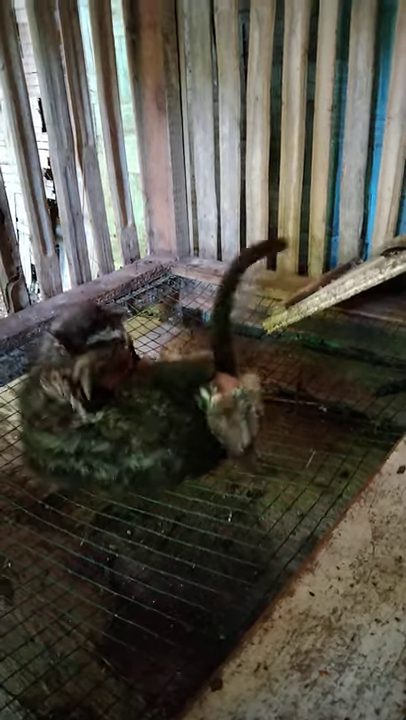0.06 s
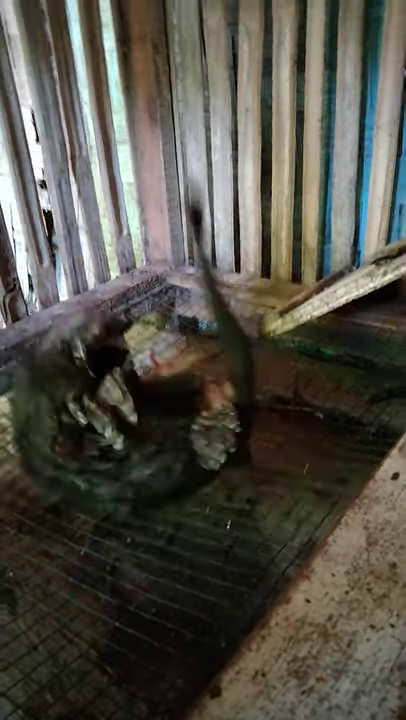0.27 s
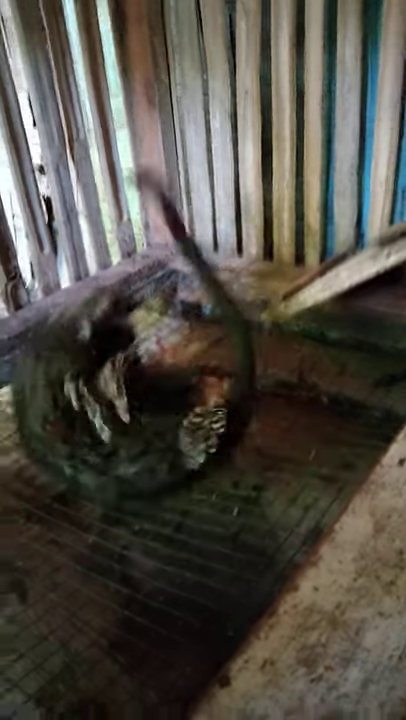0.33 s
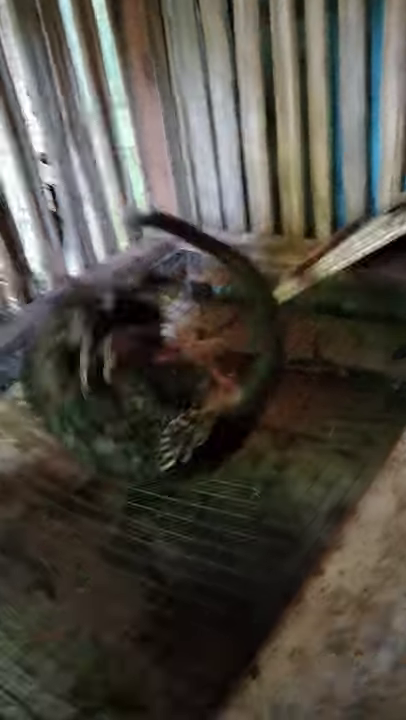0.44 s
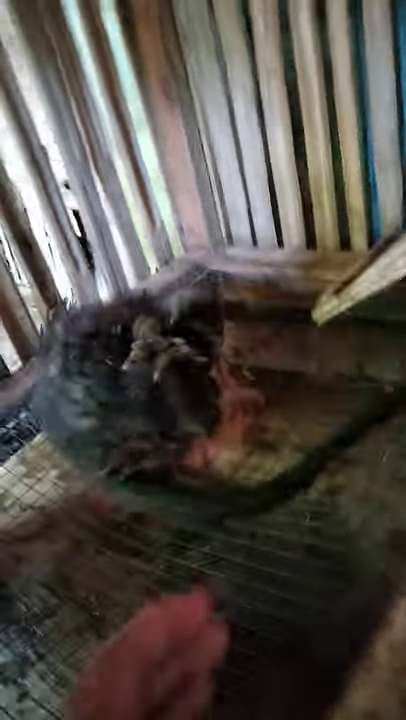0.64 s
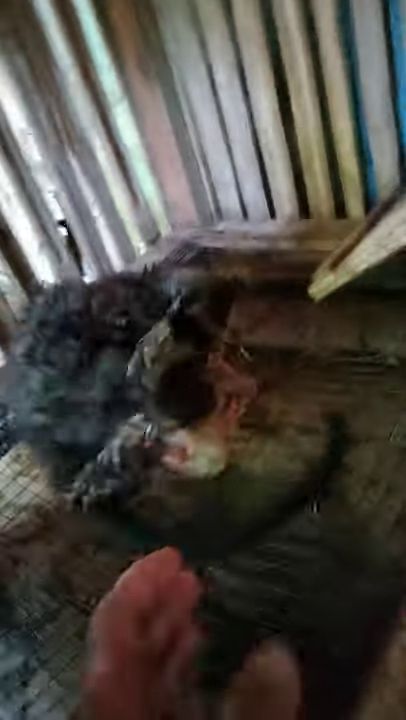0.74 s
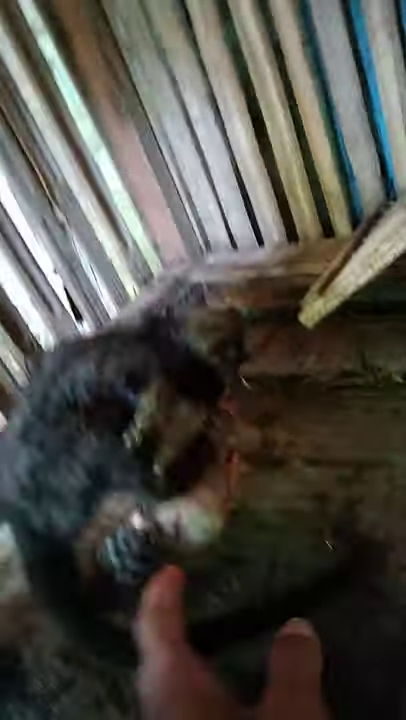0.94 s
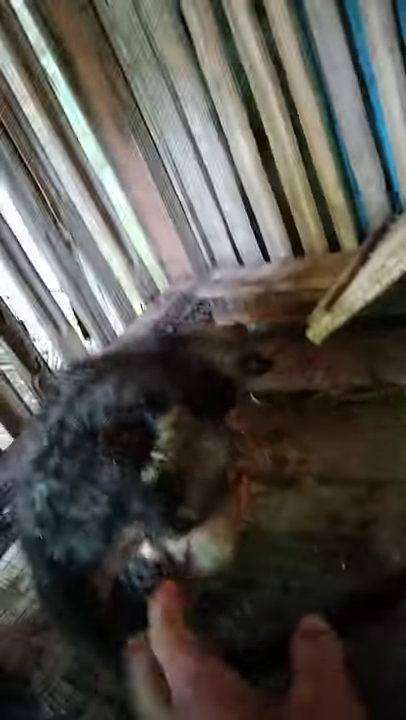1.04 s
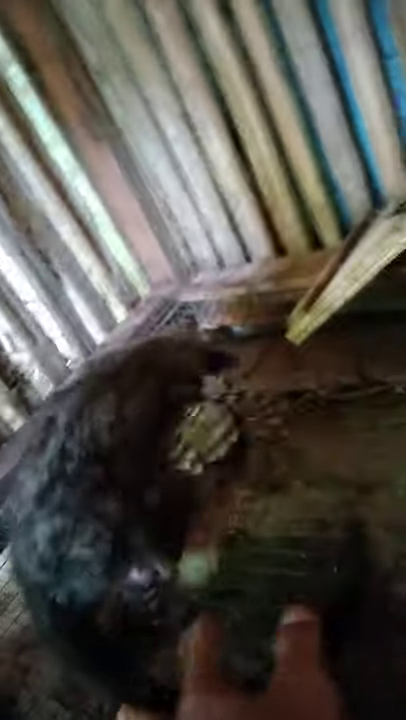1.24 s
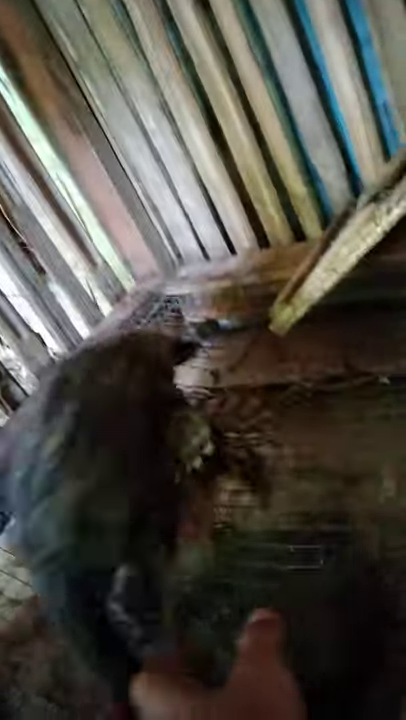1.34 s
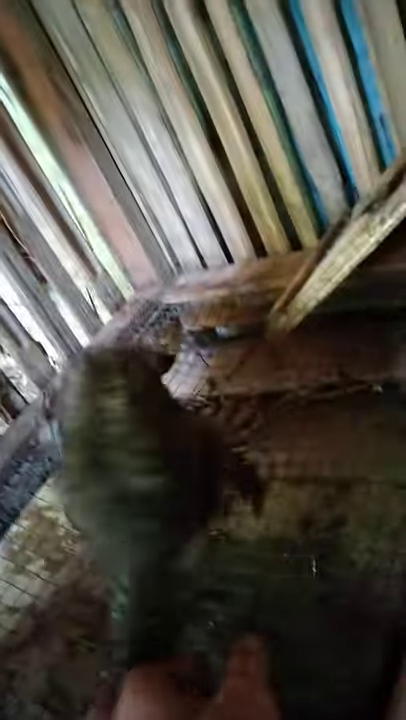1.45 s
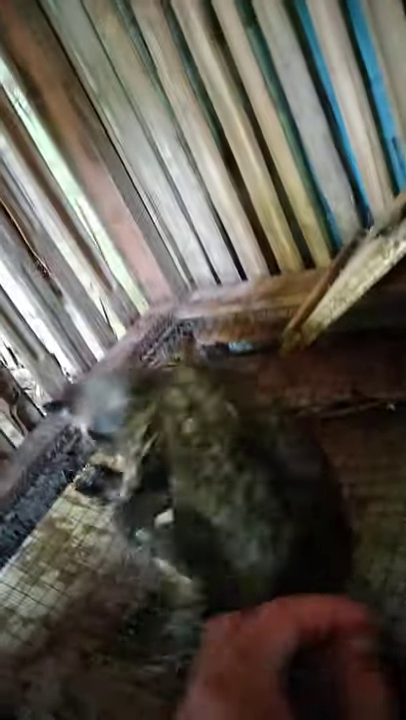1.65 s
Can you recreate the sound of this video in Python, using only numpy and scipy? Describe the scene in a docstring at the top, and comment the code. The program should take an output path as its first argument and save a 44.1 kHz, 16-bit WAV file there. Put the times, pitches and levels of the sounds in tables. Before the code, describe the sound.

Close, slightly boxy pickup: a shrill animal squeal slides down and cracks within half a second, with soft fur and claw scuffing, then a scramble of dull knocks on boards, quiet low rumble and thin insect tone behind.

```python
"""From the start, a small furry animal in a slatted wooden cage scuffs over the wire-mesh floor and whistles.
Its one high cry begins as two clashing tones, goes on as a pure one, falls in two steps and breaks.
The scuffs, made of tiny clicks, go on; later come bumps that ring the boards as it scrambles away.
The cage adds a short ring to all this. A low noise rumble and a faint, thin insect tone last throughout."""
import sys
import numpy as np
from scipy import signal
from scipy.fft import rfft, irfft
from scipy.io import wavfile
from scipy.ndimage import uniform_filter1d

SR = 44100
rng = np.random.default_rng(int(sys.argv[2]) if len(sys.argv) > 2 else 0)


def generate_wav(signal):
    """Clip the signal to [-1, 1] and save it as 16-bit WAV at the path in sys.argv[1]."""
    frames = np.transpose(np.atleast_2d(signal))
    scaled = np.clip(frames, -1, 1) * 32767
    pcm = np.round(scaled).astype(np.int16)
    wavfile.write(sys.argv[1], SR, pcm)


N = 74970  # length in samples, 1.7 s


def undb(db):
    """Turn decibels into a plain gain."""
    return 10 ** (np.asarray(db) / 20)


def unit(x):
    """Scale to rms 1."""
    return x / np.sqrt(np.mean(x ** 2) + 1e-20)


def curve(table, axis=1):
    """One column of a table, joined by straight lines in time."""
    rows = np.array(table)
    return np.interp(np.arange(N) / SR, rows[:, 0], rows[:, axis])


def colour(x, spectrum):
    """Shape a signal with a spectrum, joined by straight lines over log frequency; rms 1."""
    hz, db = np.array(spectrum).T
    f = np.maximum(np.fft.rfftfreq(N, 1 / SR), 1)
    gain = undb(np.interp(np.log(f), np.log(hz), db))
    return unit(irfft(rfft(x) * gain, N))


def resonate(x, hz, width):
    """One resonance, gain 1 at its centre."""
    return signal.lfilter(*signal.iirpeak(hz, hz / width, fs=SR), x)


def walk(rate):
    """Smooth random drift with about `rate` new values a second; rms 1."""
    k = int(SR / rate)
    steps = np.repeat(rng.standard_normal(N // k + 1), k)
    return unit(uniform_filter1d(steps, k)[:N])


CONTACT_LIFE = 2.9  # contact ends after about this many decay times


def swell(peak_s, rise_s, decay_s):
    """An envelope that climbs to a peak, dies away and stops."""
    t = np.arange(N) / SR - peak_s
    age = np.maximum(t, 0) / decay_s
    return np.exp(-(np.minimum(t, 0) / rise_s) ** 2 - age - (age / CONTACT_LIFE) ** 2)


GRAINS_PER_S, GRAIN_SPREAD_DB = 4500, 3.5


def contacts(rub=0.46):
    """Dense tiny clicks of uneven size over smooth rubbing."""
    happens = rng.random(N) < GRAINS_PER_S / SR
    sign = rng.choice([-1, 1], N)
    size = undb(GRAIN_SPREAD_DB * np.minimum(rng.exponential(size=N), 4))
    return unit(unit(happens * sign * size) + rub * rng.standard_normal(N))


# pitch of the main whistle: t/s, f/Hz
WHISTLE_PITCH = [(0, 4520), (.06, 4502), (.1, 4600), (.118, 4640), (.14, 4530), (.175, 4492), (.196, 4420),
                 (.208, 4210), (.226, 3945), (.262, 3828), (.287, 3670), (.315, 3670), (.356, 3453),
                 (.378, 2928), (.388, 2500), (.396, 2356), (.401, 1998), (.42, 2002)]
# strength of the cry as heard, with a brief dip where reflections cancel it:
# t/s, level/dB, octave overtone level/dB relative to the fundamental
HEARD_LEVEL = [(0, -45.5, -11), (.055, -43, -14.5), (.1, -39, -10.5), (.125, -39, -6.5), (.172, -40, -9),
               (.19, -31.5, -10.5), (.208, -31, -21), (.225, -19, -15), (.252, -21, -20),
               (.28, -18.5, -26.5), (.3, -23, -23), (.322, -20, -19), (.34, -52.5, 3.5), (.352, -22, -15.5),
               (.37, -31.5, -26.5), (.388, -35, -28.5), (.403, -31, -33), (.412, -48.5, -29)]
# second whistle: t/s, f/Hz above the main one, level/dB relative to the main one,
# level/dB of the combination tone above both, relative to the second whistle
SECOND_WHISTLE = [(0, 429, 9.5, -11.5), (.04, 446.6, 10, -13.5), (.068, 405.3, 2.5, -13.5),
                  (.1, 370, 0.5, -13), (.118, 392, 2, -17.5), (.14, 506, 1.5, -16.5), (.175, 489, 1, -20),
                  (.2, 373, 1, -25), (.222, 480, -21, -46), (.25, 509, -58.5, -71.5)]
# highest overtones: t/s, third overtone level/dB, fourth overtone level/dB
TOP_OVERTONES = [(0, -67, -90), (.13, -64.5, -88), (.22, -61, -97.5), (.262, -59, -79), (.28, -68.5, -63.5),
                 (.33, -55, -63.5), (.358, -62.5, -54.5), (.378, -78, -75), (.395, -100, -100)]
PITCH_JITTER, RELEASE_S = 0.0023, 0.036  # jitter as a fraction of the pitch
# the voice turns rough as it gives out: extra jitter at its peak, when, and how far to each side
BREAK_JITTER, BREAK_S, BREAK_LENGTH_S = 0.056, 0.3965, 0.012
# overtone roughness, scaled for each overtone: always there, extra for clashing whistles, and its speed
PURE_RASP, CLASH_RASP, RASP_HZ = 0.13, 0.14, 503
OCTAVE_ROUGHNESS, TOP_ROUGHNESS = 0.73, 1.7  # the highest overtones are rougher
UNDERTONE_DB, UNDERTONE_FALL_DB = -18, -10.5  # tone under the pair; the next one down is this much weaker
CROSS_TONE_DB = -9.5  # combination tones between the pair's overtones
SECOND_THIRD_DB = -7.5  # the second whistle's third overtone is weaker


def cry():
    """Two close whistles beat and make combination tones; the lower goes on alone, pure, then falls and breaks."""
    t = np.arange(N) / SR
    near_break = np.exp(-((t - BREAK_S) / BREAK_LENGTH_S) ** 2)
    jitter = PITCH_JITTER * walk(350) + BREAK_JITTER * near_break * walk(700)
    hz = uniform_filter1d(curve(WHISTLE_PITCH), size=200, mode="nearest") * (1 + jitter)
    gap_hz = curve(SECOND_WHISTLE) * (1 + 0.016 * walk(300))

    # complex tones: multiplying two adds their frequencies, dividing subtracts them
    main = np.exp(2j * np.pi * np.cumsum(hz) / SR)
    beat = np.exp(2j * np.pi * np.cumsum(gap_hz) / SR)

    # the two whistles share the power
    ratio = undb(curve(SECOND_WHISTLE, axis=2))
    lower = 1 / np.hypot(1, ratio)
    upper = ratio / np.hypot(1, ratio)
    clash = 2 * lower * upper  # 1 when they are equally strong

    above = undb(curve(SECOND_WHISTLE, axis=3) + 2 * walk(60)) * beat
    undertone = clash * lower * undb(UNDERTONE_DB + 2 * walk(60)) / beat
    below = undertone * (1 + undb(UNDERTONE_FALL_DB) / beat)
    cross = undb(CROSS_TONE_DB) * clash * beat

    def rasp(scale):
        depth = scale * (PURE_RASP + CLASH_RASP * clash)
        return 1 + depth * (walk(RASP_HZ) + 1j * walk(RASP_HZ))

    base = main * (lower + below + upper * beat * (1 + above + above ** 2))
    octave_mix = lower + cross + upper * beat ** 2 * (1 + 2 * above)
    octave = main ** 2 * rasp(OCTAVE_ROUGHNESS) * octave_mix
    third_mix = lower + cross * (1 + beat) + undb(SECOND_THIRD_DB) * upper * beat ** 3
    third = main ** 3 * rasp(TOP_ROUGHNESS) * third_mix
    fourth = main ** 4 * rasp(TOP_ROUGHNESS)

    low = undb(curve(HEARD_LEVEL)) * (base + undb(curve(HEARD_LEVEL, axis=2)) * octave)
    third_gain = undb(curve(TOP_OVERTONES) + 2 * walk(90))
    fourth_gain = undb(curve(TOP_OVERTONES, axis=2) + 2 * walk(81))
    high = third_gain * third + fourth_gain * fourth
    release = np.clip((HEARD_LEVEL[-1][0] - t) / RELEASE_S + 1, 0, 1)
    return np.sqrt(2) * release * (low + high).imag  # the root makes levels rms


# scuffs of fur and claws on the mesh: peak t/s, rise t/s, decay t/s, body level/dB, scratch level/dB
MESH_SCUFFS = [(.006, 0.0032, 0.028, -50.5, -60.5), (.095, 0.023, 0.036, -64.5, -63),
               (0.148, 0.018, 0.058, -60.5, -69.5), (0.195, 0.013, 0.036, -49, -60),
               (.255, 0.021, 0.058, -48.5, -59.5), (.267, 0.0045, .008, -54.5, -51.5),
               (0.404, 0.0056, 0.032, -57, -64.5), (0.486, .01, 0.064, -74.5, -69.5),
               (.578, .01, 0.037, -65.5, -70.5), (0.609, 0.0079, 0.035, -58, -59),
               (0.641, 0.0063, 0.0069, -58.5, -49), (0.656, 0.034, .024, -51, -84),
               (0.719, 0.012, 0.018, -61.5, -69.5), (.778, 0.032, 0.011, -66.5, -68.5),
               (.884, 0.0058, .012, -62.5, -64.5), (0.907, 0.022, 0.027, -53, -64),
               (.955, 0.0032, 0.0097, -60, -57), (0.989, 0.011, 0.013, -94, -69),
               (1.11, .012, 0.038, -58.5, -67), (1.139, 0.012, 0.031, -62.5, -59),
               (1.245, 0.018, 0.045, -54.5, -61.5), (1.306, 0.02, 0.056, -52.5, -64),
               (1.434, 0.0037, 0.077, -57.5, -62.5), (1.522, 0.028, 0.0068, -65, -62),
               (1.585, 0.037, 0.042, -55.5, -67), (1.664, 0.033, .05, -57, -62.5)]
# low rumbles of the floor: peak t/s, rise t/s, decay t/s, level/dB
FLOOR_RUMBLES = [(.275, 0.065, .03, -57), (.69, 0.058, 0.067, -60.5)]
# spectrum of the scuffs' body: f/Hz, level/dB
BODY_SPECTRUM = [(25, -49), (50, -26.5), (140, -5.5), (300, -6.5), (650, -1.5), (950, -6), (1420, 2),
                 (2000, -9), (2600, -18), (4500, -18), (15000, -44)]
# spectrum of the scratching: f/Hz, level/dB
SCRATCH_SPECTRUM = [(800, -23.5), (2400, 2.5), (3800, 2.5), (5500, -7.5), (7700, 0), (9500, -13.5),
                    (15000, -12.5)]
# spectrum of soft thuds, also used by the bumps: f/Hz, level/dB
THUD_SPECTRUM = [(30, -49.5), (60, -16), (100, 1.5), (170, -17), (400, -6.5), (1500, -36)]
FLOOR_HZ, FLOOR_WIDTH_HZ = 165, 33


def scuffs():
    """Sliding contacts shake the floor and scratch along the wires; the floor rumbles under shifting weight."""
    body_power = scratch_power = rumble_level = 0
    for s, rise, decay, body_db, scratch_db in MESH_SCUFFS:
        shape = swell(s, rise, decay)
        body_power = body_power + (undb(body_db) * shape) ** 2
        scratch_power = scratch_power + (undb(scratch_db) * shape) ** 2
    for s, rise, decay, db in FLOOR_RUMBLES:
        rumble_level = rumble_level + undb(db) * swell(s, rise, decay)
    body = np.sqrt(body_power) * colour(contacts(), BODY_SPECTRUM)
    scratch = np.sqrt(scratch_power) * colour(contacts(), SCRATCH_SPECTRUM)
    floor = unit(resonate(colour(contacts(), THUD_SPECTRUM), FLOOR_HZ, FLOOR_WIDTH_HZ))
    return body + scratch + rumble_level * floor


# bumps against the boards: peak t/s, rise t/s, decay t/s, wood level/dB, crack level/dB,
# thud level/dB, most excited f/Hz, treble lift of the crack level/dB
BOARD_BUMPS = [(1.077, 0.0082, 0.019, -48.5, -49, -75, 790, 1),
               (1.149, .005, 0.0066, -53, -80, -71, 444, 0),
               (1.208, 0.0036, 0.016, -45, -45, -76, 1450, -6),
               (1.266, 0.0036, 0.0095, -40, -56, -60, 1350, -8),
               (1.325, 0.0054, 0.018, -47.5, -48.5, -62, 1770, -3),
               (1.358, 0.0041, 0.013, -46, -63, -73, 1860, 6),
               (1.414, 0.0038, 0.015, -47.5, -58.5, -69, 1600, 18),
               (1.549, 0.0022, 0.017, -42.5, -44.5, -54.5, 1030, 11.5),
               (1.61, 0.0038, 0.0095, -48.5, -58.5, -62.5, 1500, 20)]
# resonances of the boards: f/Hz, width f/Hz, level/dB
BOARD_RESONANCES = [(454, 44, 2), (546, 54, 4), (758, 77, 3), (1032, 117, -1.5), (1469, 108, 7.5),
                    (1679, 67, 7), (2005, 78, -31), (2720, 110, -35), (3220, 170, -17.5)]
# spectrum of the dry crack, before the treble lift: f/Hz, level/dB
CRACK_SPECTRUM = [(700, 0), (2000, 1.5), (3200, 5.5), (4300, 4), (5400, -10.5), (7700, -3.5), (10000, -26),
                  (15000, -18.5)]
CRACK_DECAY_S, THUD_DECAY_S = 0.0062, 0.031
STRIKE_DB_PER_OCTAVE = 10  # fall of the boards' response away from the most excited pitch
CRACK_TREBLE_HZ = (4380, 7500)  # a harder contact lifts the spectrum across this range


def ring_boards(x, struck_hz):
    """The boards' resonances answer a contact, favouring those near the struck pitch."""
    out = 0
    for hz, width, db in BOARD_RESONANCES:
        fall_db = STRIKE_DB_PER_OCTAVE * abs(np.log2(hz / struck_hz))
        out = out + undb(db - fall_db) * resonate(x, hz, width)
    return out


def bumps():
    """Each bump is a short clatter that rings the boards, with a dry crack and a soft thud."""
    out = 0
    for s, rise, decay, wood_db, crack_db, thud_db, struck_hz, treble_db in BOARD_BUMPS:
        clatter = contacts(rub=0.68)
        # level set by how loudly a steady clatter would ring the boards
        steady = np.std(ring_boards(clatter, struck_hz))
        wood = ring_boards(clatter * swell(s, rise, decay), struck_hz) / steady
        hardness = [(hz, db + np.interp(hz, CRACK_TREBLE_HZ, (0, treble_db))) for hz, db in CRACK_SPECTRUM]
        crack = swell(s, rise, CRACK_DECAY_S) * colour(clatter, hardness)
        thud = swell(s, rise, THUD_DECAY_S) * colour(rng.standard_normal(N), THUD_SPECTRUM)
        out = out + undb(wood_db) * wood + undb(crack_db) * crack + undb(thud_db) * thud
    return out


# close reflections in the cage: delay t/s, level/dB
CAGE_ECHOES = [(.0031, -21), (.0074, -19), (0.0122, -18.5), (.021, -17.5)]
CAGE_DB, CAGE_T60_S = -13.5, 0.17  # tail level, and time to fall by 60 dB


def cage(x):
    """A few close reflections off the slats, and a short diffuse tail."""
    t = np.arange(SR // 2) / SR
    tail = rng.standard_normal(len(t)) * undb(-60 * t / CAGE_T60_S) * np.minimum(t / .008, 1)
    response = undb(CAGE_DB) * tail / np.linalg.norm(tail)
    for s, db in CAGE_ECHOES:
        response[int(s * SR)] += undb(db)
    return x + signal.fftconvolve(x, response)[:N]


# spectrum of the background rumble: f/Hz, level/dB
RUMBLE_SPECTRUM = [(25, -25.5), (50, -18.5), (90, 0), (140, 1.5), (250, -6.5), (400, -12), (1400, -14.5),
                   (2800, -26), (4400, -31), (8000, -34), (15500, -37)]
# strength of the insect: t/s, level/dB
INSECT_STRENGTH = [(0, -65), (.65, -80.5), (.77, -73), (.88, -79.5), (1.7, -76.5)]
RUMBLE_DB = -65.5
INSECT_HZ, INSECT_WIDTH_HZ = 5153, 158  # width of each of two resonances in a row


def background():
    """Low outdoor rumble, and a distant insect's narrow tone made by passing noise through two resonances."""
    insect = rng.standard_normal(N)
    for _ in range(2):
        insect = resonate(insect, INSECT_HZ, INSECT_WIDTH_HZ)
    rumble_level = undb(RUMBLE_DB + 1.2 * walk(4.9))
    rumble = rumble_level * colour(rng.standard_normal(N), RUMBLE_SPECTRUM)
    return rumble + undb(curve(INSECT_STRENGTH)) * unit(insect)


def scene():
    """The animal's sounds ring in the cage; the background does not."""
    animal = cry() + scuffs() + bumps()
    return (cage(animal) + background())[None]


RUMBLE_CUT_HZ, TOP_HZ = 61, 15750


def record(dry):
    """The recorder thins the deep bass and cuts the top."""
    bass_cut = signal.butter(2, RUMBLE_CUT_HZ, "highpass", fs=SR, output="sos")
    top_cut = signal.ellip(10, .2, 80, TOP_HZ, fs=SR, output="sos")
    return signal.sosfilt(top_cut, signal.sosfilt(bass_cut, dry))


dry = scene()
out = record(dry)
generate_wav(out)
```